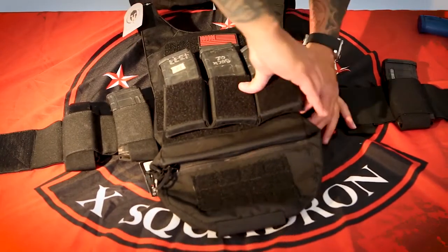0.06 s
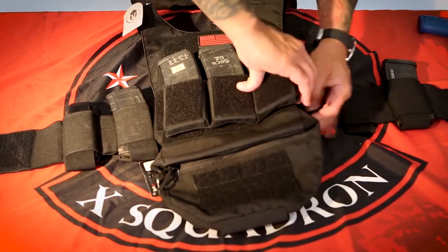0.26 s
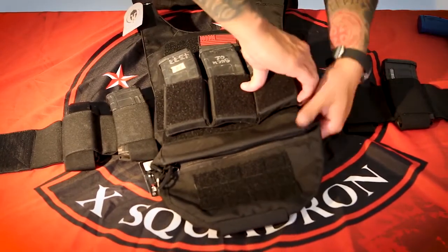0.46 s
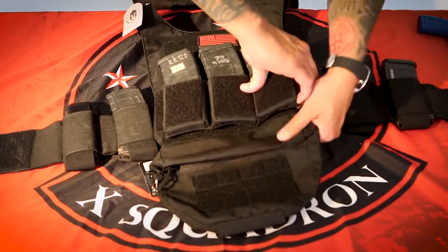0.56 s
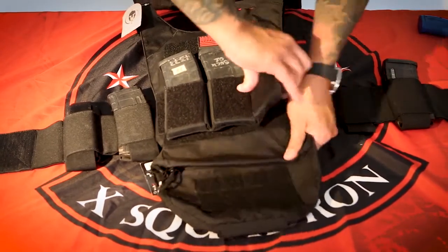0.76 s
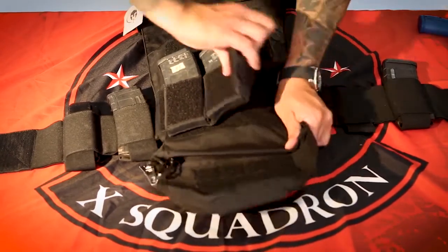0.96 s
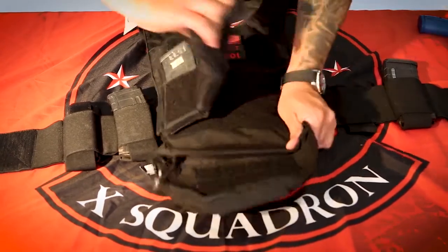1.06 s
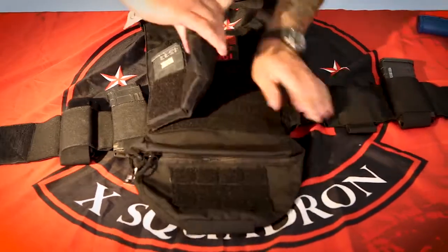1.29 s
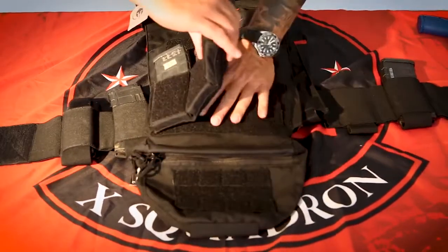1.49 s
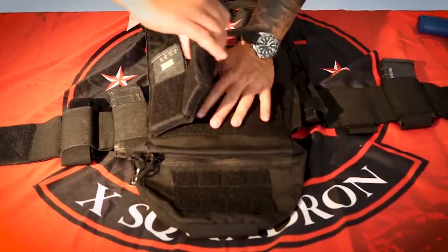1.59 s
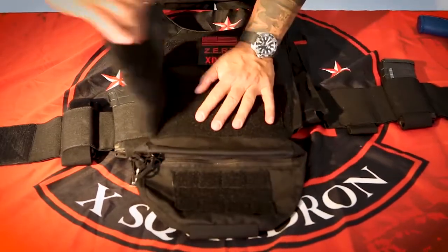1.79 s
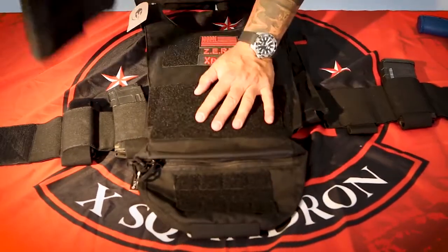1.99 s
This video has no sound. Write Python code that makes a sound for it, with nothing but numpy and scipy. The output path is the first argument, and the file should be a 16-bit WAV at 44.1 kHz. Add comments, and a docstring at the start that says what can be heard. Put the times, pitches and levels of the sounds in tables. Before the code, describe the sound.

Three ripping peels of a hook-and-loop pouch panel off a nylon vest, close up in a small room

```python
"""On a table in a small live room, a pouch panel is peeled off a nylon vest in three pulls.
Hooks snap loose at random and shake the taut fabric: coloured impulses with a short rattle.
Fingers rub and creak in the grip, fasteners tick and cloth slides: shaped noise. A buckle knocks
in damped modes; the vest bumps the table: wavering sine plus thud. A room tail, air and hum follow."""
import sys
import numpy as np
from scipy import signal
from scipy.io import wavfile
from scipy.ndimage import uniform_filter1d, minimum_filter1d

SR = 44100
rng = np.random.default_rng(int(sys.argv[2]) if len(sys.argv) > 2 else 0)


def digitize_waveform(pressure):
    """Quantize a signal to 16-bit integers and store it at the path in sys.argv[1].

    Rows of a 2-D input are taken as channels; values are limited to [-1, 1].
    """
    field = np.atleast_2d(pressure).T
    bounded = np.clip(field, -1, 1)
    quanta = np.round(bounded * 32767).astype(np.int16)
    wavfile.write(sys.argv[1], SR, quanta)


N = 89919
TIME = np.arange(N) / SR
EDGES_HZ = np.geomspace(28, 18000, 25)
CENTRES_HZ = np.sqrt(EDGES_HZ[1:] * EDGES_HZ[:-1])
BANK = [signal.butter(2, EDGES_HZ[k:k + 2], "band", fs=SR, output="sos") for k in range(len(CENTRES_HZ))]


def from_db(db):
    """Decibels to gain."""
    return 10 ** (np.asarray(db) / 20)


def rms_one(x):
    """Scale to unit rms."""
    return x / np.sqrt(np.mean(x ** 2) + 1e-20)


def at_hz(points, hz):
    """Read a table over log frequency."""
    f, value = np.transpose(points)
    return np.interp(np.log(hz), np.log(f), value)


def band(x, k):
    """The k-th band of the filter bank."""
    return signal.sosfilt(BANK[k], x + 1e-18)


def band_gains(spectrum):
    """Band gains that colour a white signal and keep its power."""
    gain = from_db(at_hz(spectrum, CENTRES_HZ))
    power = np.sum(gain ** 2 * np.diff(EDGES_HZ)) * 2 / SR
    return gain / np.sqrt(power)


def noise(spectrum, envelope):
    """Coloured noise, driven by an envelope before the filters."""
    return sum(g * band(envelope * rng.standard_normal(N), k) for k, g in enumerate(band_gains(spectrum)))


def drift(corner_hz):
    """Smooth random signal of unit rms: white noise through a double pole."""
    r = np.exp(-2 * np.pi * corner_hz / SR)
    settled = signal.lfilter([1], [1, -2 * r, r * r], rng.standard_normal(N + SR))[SR:]
    return rms_one(settled)


def bursts(rows, decay_s):
    """Sharp attacks that die away, each with the energy of its row."""
    power = sum(from_db(2 * db) * (TIME >= s) * np.exp(-2 * np.abs(TIME - s) / decay_s) for s, db in rows)
    return np.sqrt(power * 2 / (decay_s * SR))


def decay(age_s, t60_s):
    """Exponential fall by 60 dB in t60."""
    return np.exp(-np.log(1000) * age_s / t60_s)


def bell(hz, peak_hz, width_octaves):
    """Gaussian resonance over log frequency."""
    return np.exp(-(np.log2(hz / peak_hz) / width_octaves) ** 2)


def hook_snaps(age_s, level_db, gate):
    """Hooks let go at random, faster as the pull grows; evened over a short window, then set to level."""
    hooks_per_s, full_pull_db, rate_follows = 2800, -14.5, .5
    spread_db, bunch_db, bunch_hz = 2.5, 0.5, 63
    rate = hooks_per_s * from_db(rate_follows * (level_db - full_pull_db))
    size_db = spread_db * np.minimum(rng.exponential(1, N), 3) + bunch_db * drift(bunch_hz)
    snaps = from_db(size_db) * (rng.random(N) < rate / SR)
    snaps = snaps / np.sqrt(np.abs(uniform_filter1d(snaps ** 2, size=600)) + 1e-4)
    return snaps * gate * from_db(level_db - 4.5)


def weave_rattle(snaps):
    """Every snap rattles on briefly in the weave: the envelope of a decaying scatter."""
    scatter_db, scatter_s = -2, 0.0024
    r = np.exp(-2 / (scatter_s * SR))
    return from_db(scatter_db) * np.sqrt(signal.lfilter([1 - r], [1, -r], snaps ** 2 + 1e-18))


def peel(pull, flap_hz, flap_fall_s, strip_db):
    """Snaps of varied colour ring the taut strip; the freed flap grows, so its lowest note falls."""
    # one hook letting go: hz, density_db
    hook = [(110, -19), (200, -8.5), (280, -8), (400, 2), (600, 3), (1000, -0.5), (1500, 0), (2100, -0.5),
            (3000, -2.5), (3800, -3.5), (5000, -4), (7500, -9.5), (10000, -19), (15500, -28.5)]
    release_s, colour_db = 0.0055, 5.5
    body_hz, body_usual_db, treble_hz, treble_usual_db = 1080, -8.5, 4760, -11.5
    strip_octaves, flap_end_hz, flap_ring_db, flap_octaves = 0.28, 251, 3.5, 0.098

    start_s, *columns = np.transpose(pull)
    level_db, body_db, treble_db, strip_hz = [np.interp(TIME, start_s, c) for c in columns]
    age_s = np.maximum(TIME - start_s[0], 0)
    gate = (TIME >= start_s[0]) * np.exp(-np.maximum(TIME - start_s[-1], 0) / release_s)
    edge_hz = flap_end_hz + (flap_hz - flap_end_hz) * np.exp(-age_s / flap_fall_s)
    snaps = hook_snaps(age_s, level_db, gate)
    rattle = weave_rattle(snaps)

    out = 0
    for k, (hz, gain) in enumerate(zip(CENTRES_HZ, band_gains(hook))):
        low = 1 / (1 + (hz / body_hz) ** 4)
        high = 1 / (1 + (treble_hz / hz) ** 4)
        tone_db = low * (body_db - body_usual_db) + high * (treble_db - treble_usual_db)
        tone_db = tone_db + strip_db * bell(hz, strip_hz, strip_octaves)
        tone_db = tone_db + flap_ring_db * bell(hz, edge_hz, flap_octaves)
        # each snap has its own gain and sign in each band
        own = rms_one(from_db(colour_db * rng.standard_normal(N))) * rng.choice([-1, 1], N)
        drive = snaps * own + rattle * rng.standard_normal(N)
        bass_cut = 1 / np.sqrt(1 + (edge_hz / hz) ** 6)
        out = out + gain * band(drive * from_db(tone_db) * bass_cut, k)
    return out


def pulls():
    """Three peels, each with its own flap pitch and strip ring."""
    # tearing: start_s, relative level_db, low body share_db, top treble share_db, taut strip ring_hz
    first_pull = [(.083, -48, -3, -3, 3600), (.097, -25, 3, -15, 3750), (.105, -31.5, -2.5, -8, 3520),
                  (.126, -23, -3.5, -12.5, 3640), (.17, -35, -15, -14.5, 3520), (.195, -27, -8, -15, 3540),
                  (.24, -19.5, -12, -11.5, 3740), (.258, -19, -8, -16, 3740), (.285, -23.5, -24, -15, 3350),
                  (.3, -37, -31, -10, 3400)]
    long_pull = [(.674, -50, -6, -5, 3000), (.70, -42, -7, -22, 2870), (.728, -23.5, -11, -12.5, 2780),
                 (.782, -24.5, -18, -13, 3060), (.806, -13.5, -13, -17, 3000),
                 (.836, -12.5, -20, -14.5, 2930), (.848, -13, -16.5, -16.5, 2980),
                 (.878, -11.5, -15.5, -12, 2800), (.915, -14.5, -11.5, -16.5, 2830),
                 (.95, -14.5, -11.5, -12, 3060), (.978, -15.5, -14.5, -17, 2970),
                 (1.012, -14, -7.5, -12.5, 2980), (1.03, -18, -14.5, -8.5, 3500),
                 (1.064, -11.5, -9.5, -11.5, 3600), (1.116, -11.5, -10, -12, 3950),
                 (1.145, -16.5, -5.5, -11, 3600), (1.172, -29.5, -5.5, -21, 3420),
                 (1.2, -21, -11.5, -9.5, 3430), (1.248, -28, -10.5, -12, 3500),
                 (1.26, -43.5, -6, -27, 3300)]
    last_pull = [(1.711, -57, -10, 3, 3400), (1.729, -47, -3, -2, 3400), (1.733, -37.5, -5, -4, 3330),
                 (1.75, -34.5, -11, -18, 3200), (1.772, -30, -9, -6, 3160), (1.779, -26, -8, -4.5, 3170),
                 (1.797, -19.5, -7, -9.5, 2960), (1.85, -16, -5.5, -10, 3000), (1.878, -19, -10, -2, 3160),
                 (1.903, -16.5, -3, -3, 3100), (1.93, -14.5, -14.5, -7.5, 3480),
                 (1.945, -19, -10.5, -10.5, 3350), (1.961, -11, -18, -13, 2960),
                 (1.966, -30, -9, -27, 3100)]
    first = peel(first_pull, flap_hz=694, flap_fall_s=0.15, strip_db=2.5)
    long = peel(long_pull, flap_hz=420, flap_fall_s=.045, strip_db=7)
    last = peel(last_pull, flap_hz=1280, flap_fall_s=0.069, strip_db=6)
    return first + long + last


def tufts():
    """Whole tufts let go at once: sharper cracks of coloured noise."""
    # cracks: start_s, relative energy_db
    tuft_rows = [(.0835, -34), (.0945, -19), (.1245, -7), (.1525, -9.5), (.188, -20), (.208, -5),
                 (.2245, -2), (.2465, 2), (.2585, -12), (.2695, 1.5), (.7085, -15), (.7175, -16),
                 (.7905, -8), (.804, -11), (.827, -4.5), (.833, -2.5), (.853, -4), (.872, 3), (.9035, -6),
                 (.9332, 4), (.965, -6), (1.0965, -15), (1.1125, -3), (1.132, 7.5), (1.221, -11),
                 (1.243, -33), (1.7115, -27.5), (1.731, -19), (1.7569, -15), (1.7669, -10), (1.775, -7),
                 (1.958, 1.5)]
    # one tuft: hz, density_db
    tuft_spectrum = [(80, -38), (250, -14), (550, -0.5), (1200, 5), (2100, -2.5), (3300, 12), (5000, -12),
                     (8000, -23.5), (15500, -30)]
    return from_db(5) * noise(tuft_spectrum, bursts(tuft_rows, decay_s=0.0018))


def grip():
    """Fingers rub and the panel creaks as they take hold; the gripped pouch adds a hollow resonance."""
    # creaks: start_s, relative energy_db
    creak_rows = [(.002, -8), (.007, -3.5), (.018, -1), (.025, -1.5), (.030, -3), (.041, 0.5), (.063, -12),
                  (.086, 3.5)]
    # one creak: hz, density_db
    creak_spectrum = [(150, -36), (400, 2), (800, -10), (1100, -1), (1450, -2), (2200, -10.5), (4000, -11),
                      (8000, -12.5), (15000, -42)]
    # fingers sliding into their grip: hz, density_db
    rub_spectrum = [(200, -24), (400, -4), (750, -14), (1150, 2), (1450, -4.5), (1900, -4), (4000, -13),
                    (15000, -39)]
    rub_db, rub_fade_s, creak_db = -41.5, .13, -12.5
    hollow_hz, hollow_q, hollow_db = 1500, 13, 7.5
    rub = noise(rub_spectrum, from_db(rub_db) * np.exp(-(TIME / rub_fade_s) ** 2))
    creaks = from_db(creak_db) * noise(creak_spectrum, bursts(creak_rows, decay_s=.0018))
    direct = rub + creaks
    hollow = signal.lfilter(*signal.iirpeak(hollow_hz, hollow_q, fs=SR), direct)
    return direct + from_db(hollow_db) * hollow


def fastener_ticks():
    """Small fastener ticks: very short bursts of coloured noise."""
    # ticks: start_s, relative energy_db
    tick_rows = [(1.489, 8), (1.548, 4.5), (1.571, 2), (1.5795, -5), (1.6272, 1.5)]
    # one tick: hz, density_db
    tick_spectrum = [(300, -13), (1800, -14), (3300, 13), (5000, -9), (9000, -14), (15000, -24)]
    return from_db(-27.5) * noise(tick_spectrum, bursts(tick_rows, decay_s=0.0013))


def cloth_brush():
    """Cloth slides as hands shift, lift the panel away and settle on the vest: flickering noise."""
    # sliding: time_s, level_db before the flicker
    brush_rows = [(.57, -89), (.61, -62), (.67, -63), (.7, -73), (1.22, -84), (1.26, -37), (1.32, -37.5),
                  (1.36, -51), (1.43, -54), (1.5, -57.5), (1.545, -55), (1.565, -52), (1.575, -47),
                  (1.6, -58.5), (1.65, -68), (1.7, -83)]
    # cloth: hz, density_db
    cloth_spectrum = [(40, -46), (100, -20), (250, -2), (600, 4), (1000, -3), (2000, -3), (3300, -3),
                      (6000, -17), (15000, -48)]
    flicker_db = 2.9 * drift(82)
    level_db = np.interp(TIME, *np.transpose(brush_rows)) + flicker_db
    return noise(cloth_spectrum, from_db(level_db))


def buckle():
    """A dull knock: a short crack and a few damped modes."""
    # knocks: start_s, level_db
    knock_rows = [(1.384, -28.5), (1.402, -33.5)]
    # modes: pitch_hz, relative level_db, t60_s
    modes = [(409, -9.5, 0.12), (540.6, 0, 0.099), (632, -7.5, 0.18), (803, -2, .13), (912, 0, 0.091),
             (1060, -4.5, 0.046), (1190, -15, 0.076), (1523, -6.5, 0.092), (2080, -27, .06)]
    # crack: hz, density_db
    crack_spectrum = [(60, -34), (250, -14), (450, 5), (900, -1), (1400, -2.5), (3300, -2), (6000, -20),
                      (15000, -72)]
    out = from_db(22.5) * noise(crack_spectrum, bursts(knock_rows, decay_s=0.013))
    for start_s, knock_db in knock_rows:
        age_s = np.maximum(TIME - start_s, 0)
        for k, (hz, mode_db, t60_s) in enumerate(modes):
            ring = decay(age_s, t60_s) * np.sin(2 * np.pi * hz * age_s)
            out = out + (-1) ** k * from_db(knock_db + mode_db) * ring
    return out


def table_bumps():
    """Soft weight thuds and sets the table top booming briefly at a wavering pitch."""
    # bumps of the vest: peak_s, boom level_db, decay_s
    bump_rows = [(0.023, -65, .04), (0.124, -62, .05), (.375, -57, 0.026), (.72, -64, 0.049),
                 (0.915, -37, 0.032), (0.953, -47, 0.027), (1.136, -71, .04), (1.228, -50, 0.022),
                 (1.274, -35, 0.032), (1.332, -42, 0.04), (1.614, -48, 0.022), (1.642, -50, 0.046),
                 (1.902, -59, .06)]
    # dull thud of the padding: hz, density_db
    thud_spectrum = [(40, -37), (85, -30), (125, -15), (170, 16), (220, 1.5), (290, -9), (400, -6),
                     (900, -45)]
    table_hz, waver, waver_hz, rise_s, thud_db = 128, .07, 33.3, 0.016, -6.5
    envelope = 0
    for peak_s, db, decay_s in bump_rows:
        age_s = TIME - peak_s
        fall = np.where(age_s < 0, (age_s / rise_s) ** 2, age_s / decay_s)
        envelope = envelope + from_db(db) * np.exp(-fall)
    phase = 2 * np.pi * np.cumsum(table_hz * (1 + waver * drift(waver_hz))) / SR
    boom = envelope * np.sin(phase)
    return boom + from_db(thud_db) * noise(thud_spectrum, envelope)


def room_tail(t60_s):
    """One band's diffuse response: delayed, decaying white noise of unit energy."""
    delay_s = 0.013
    age_s = TIME[:SR]
    h = rng.standard_normal(SR) * (age_s > delay_s) * decay(age_s, t60_s)
    return rms_one(h) / np.sqrt(SR)


def room(x):
    """Diffuse tail, shortest in the top treble; two tails trade places as the tear travels."""
    # decay: hz, t60_s
    room_t60 = [(125, 0.31), (500, 0.38), (1200, 0.33), (2200, 0.42), (3400, 0.45), (5500, 0.4),
                (8000, .34), (15000, 0.092)]
    # tail: hz, level_db
    room_level = [(40, -34), (125, 0.5), (500, -8.5), (1200, -8.5), (2200, -7), (3500, -6), (5000, -7),
                  (8000, -8.5), (15000, -4.5)]
    turns_per_s = 3
    turn, out = 2 * np.pi * turns_per_s * TIME, 0
    for share in (np.cos(turn), np.sin(turn)):
        tail = 0
        for k, hz in enumerate(CENTRES_HZ):
            tail = tail + from_db(at_hz(room_level, hz)) * band(room_tail(at_hz(room_t60, hz)), k)
        out = out + signal.fftconvolve(x * share, tail)[:N]
    return out


def room_floor():
    """Quiet air as steady coloured noise, with a faint sine hum."""
    # air: hz, density_db
    air_spectrum = [(30, -18), (70, -18), (125, -0.5), (240, -1), (330, -3), (700, -10), (1600, -11),
                    (4000, -21), (8000, -24), (15000, -28)]
    air_db, hum_hz, hum_rms_db = -62.5, 232, -67.5
    hum = from_db(hum_rms_db) * np.sqrt(2) * np.sin(2 * np.pi * hum_hz * TIME)
    return noise(air_spectrum, from_db(air_db)) + hum


def scene():
    """Peeling, handling and buckle excite the room; bumps and floor are added dry."""
    near = pulls() + tufts() + grip() + fastener_ticks() + cloth_brush() + buckle()
    return (near + room(near) + table_bumps() + room_floor())[None]


def record(dry):
    """A fast limiter holds the peaks; the deep bass and the top are cut."""
    ceiling, bass_cut_hz, top_cut_hz = .9, 65, 15900
    gain = minimum_filter1d(ceiling / np.maximum(np.abs(dry), ceiling), size=61)
    limited = dry * uniform_filter1d(gain, size=61)
    x = signal.sosfilt(signal.butter(2, bass_cut_hz, "high", fs=SR, output="sos"), limited)
    return signal.sosfilt(signal.ellip(12, .1, 90, top_cut_hz, fs=SR, output="sos"), x)


dry = scene()
out = record(dry)
digitize_waveform(out)
```